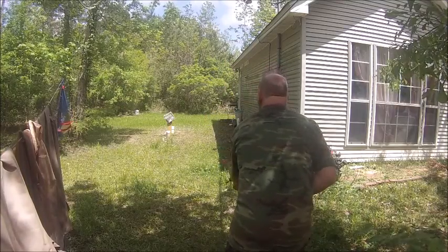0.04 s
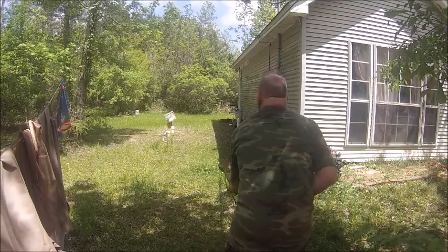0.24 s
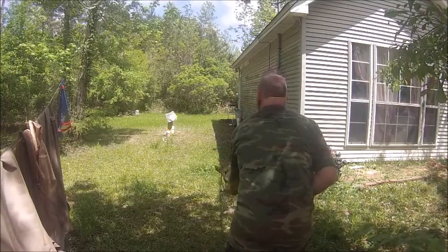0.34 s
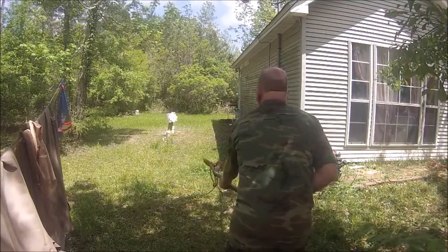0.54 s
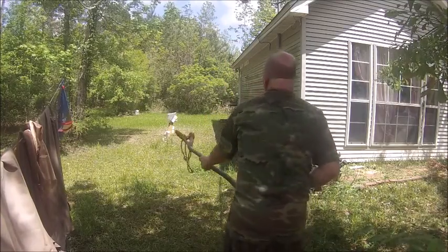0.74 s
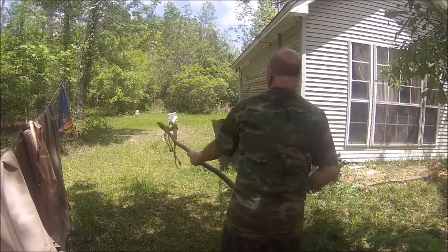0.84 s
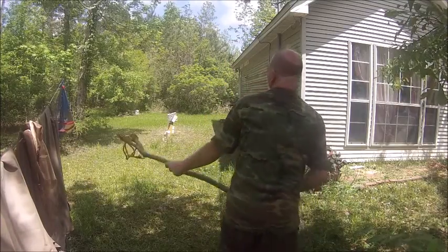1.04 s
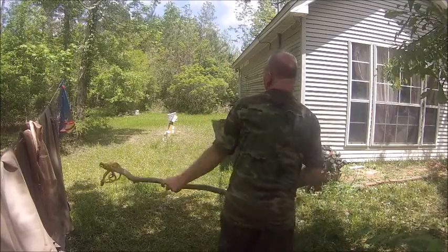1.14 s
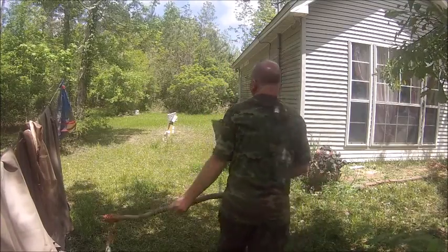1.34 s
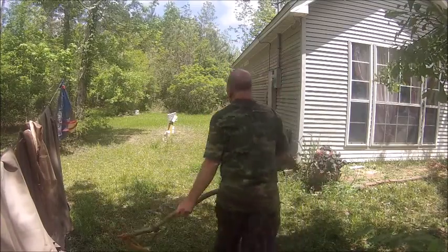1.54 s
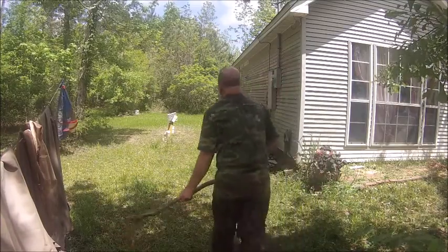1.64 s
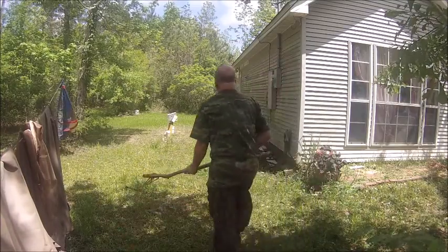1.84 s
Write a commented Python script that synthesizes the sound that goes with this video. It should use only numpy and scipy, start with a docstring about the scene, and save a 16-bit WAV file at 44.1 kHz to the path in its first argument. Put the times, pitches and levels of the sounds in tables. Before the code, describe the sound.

A rubber-band crossbow fires once with a sharp, close snap in a garden.

```python
"""A rubber-band crossbow fires once in a garden, close enough to overload the microphone: the band slaps home
and rings the stock. Lawn, wall, fence and house reflect the snap, house and bushes scatter it, and the woods
ring on. Far off the shot knocks on something; clothes rustle, birds whistle in the trees and insects whine in
the grass. Light wind and soft bumps reach the microphone over a low hum."""
import sys
import numpy as np
from scipy import signal
from scipy.fft import rfft, irfft
from scipy.io import wavfile
from scipy.ndimage import uniform_filter1d

SR = 44100
rng = np.random.default_rng(int(sys.argv[2]) if len(sys.argv) > 2 else 0)


def wav_record(signal):
    """Record a signal, one row per channel, as 16-bit PCM in the file named by sys.argv[1]."""
    frames = np.transpose(np.atleast_2d(signal))
    bounded = np.clip(frames, -1, 1)
    # unit amplitude maps onto the largest positive 16-bit level
    quanta = np.round(bounded * 32767).astype(np.int16)
    wavfile.write(sys.argv[1], SR, quanta)


N = 83790

# still garden air: frequency_hz, relative_db
AIR_SPECTRUM = [(120, -45), (200, -7), (240, -3.5), (298, -1.5), (405, -4.5), (624, -4.5), (721, -7.5),
                (789, -4), (1410, -6.5), (1690, -14), (2460, -10), (3010, -15), (15000, -32.5)]
# hiss that differs between left and right: frequency_hz, relative_db
SIDE_SPECTRUM = [(100, 1), (500, -12.5), (2000, -11), (4500, -2.5), (8000, -5.5), (11000, -24)]
# course of the low hum: time_s, level_db
HUM_LEVELS = [(0, -40), (.3, -46.5), (0.549, -55), (.74, -52), (.86, -42), (1.2, -41), (1.6, -40),
              (1.9, -41)]
# gusts on the microphone: time_s, level_db
GUST_LEVELS = [(0, -34), (.06, -38), (.12, -51.5), (0.201, -36), (.29, -44), (.36, -34.5), (.62, -37),
               (.71, -44), (.77, -38), (.87, -43.5), (1.011, -39), (1.08, -51), (1.481, -51.5),
               (1.62, -40.5), (1.751, -37), (1.79, -46.5), (1.85, -39), (1.9, -48.5)]
# rumble of the gusts: frequency_hz, relative_db
WIND_SPECTRUM = [(20, -4), (45, -2), (90, 2), (160, -6.5), (230, -16), (330, -28.5), (600, -43.5),
                 (2000, -70.5)]
# bumps on the microphone: start_s, level_db
MIC_BUMPS = [(.192, -27), (1.005, -33), (1.722, -25), (1.742, -23), (1.836, -20)]
# ring of one bump: pitch_hz, relative_db, t60_s
MIC_BUMP_MODES = [(85, 0, .05), (150, -6, .04)]
# opening wash of noise: frequency_hz, relative_db
WASH_SPECTRUM = [(180, -44), (300, -4), (943, -6.5), (1110, -4), (1620, -13.5), (3330, -15), (10800, -28),
                 (15000, -29.5)]
# insects in the grass: pitch_hz, width_hz, level_db, fade_start_s
INSECT_WHINES = [(10100, 310, -78, .23), (9200, 500, -83, 2.2)]
# bird whistles that dip and sweep up: start_s, level_db
BIRD_WHISTLES = [(1.515, -60), (1.80, -59)]
# course of one whistle: age_s, pitch_hz, relative_db
WHISTLE_SHAPE = [(0, 2750, -7), (.022, 2370, 0), (.04, 2350, 0), (.06, 2380, -10), (.08, 2720, -1),
                 (.103, 3500, 0), (.12, 3700, -14)]
# flatter bird notes: start_s, length_s, first_hz, last_hz, level_db
BIRD_NOTES = [(.06, 0.083, 2570, 2540, -65), (0.161, 0.065, 2630, 2650, -60), (0.743, 0.1, 2807, 2760, -65),
              (0.853, 0.04, 3425, 3070, -65), (.87, 0.22, 2755, 2910, -67), (1.125, .09, 2510, 2460, -69)]
# rustles of cloth and grass: peak_s, spread_s, level_db
RUSTLE_SWELLS = [(0.602, 0.025, -59), (0.75, .006, -59), (0.764, 0.035, -62), (1.44, 0.023, -64.5),
                 (1.556, 0.049, -66.5), (1.716, 0.037, -64), (1.825, 0.021, -66)]
# hiss of a rustle: frequency_hz, relative_db
RUSTLE_SPECTRUM = [(500, -8), (1500, 10), (4000, -2.5), (7000, 0.5), (10500, 4), (15000, -4)]
# knocks far down the garden: start_s, level_db
FAR_KNOCKS = [(0.4644, -40), (.619, -40.5), (0.6909, -39.5), (0.7183, -44.5)]
# ring of the thing struck: pitch_hz, relative_db, t60_s
TARGET_MODES = [(994, -6, .04), (1144, -1.5, 0.032), (1400, -12, .025)]
# late echo of the woods: frequency_hz, relative_db
WOODS_SPECTRUM = [(300, -32.5), (700, -9.5), (1000, 0.5), (1400, -5), (2000, -13.5), (3000, -20),
                  (3550, -17), (4600, -25), (9000, -24), (15000, -33.5)]
# early scatter from house, fence and bushes: frequency_hz, relative_db
SCATTER_SPECTRUM = [(150, -18.5), (400, -23), (520, -8.5), (600, -5), (710, -10.5), (850, 0.5),
                    (1150, -2.5), (1550, -6), (1830, -19), (2060, -12.5), (2350, -18.5), (2550, -17.5),
                    (3100, -29), (3520, -15), (3850, -23.5), (4200, -24.5), (4800, -31), (7200, -31.5),
                    (10500, -37.5), (15000, -44.5)]
# narrow rings in the scatter: pitch_hz, width_hz, level_db, t60_s
SCATTER_RINGS = [(3510, 230, -46, 0.92), (540, 90, -37, 0.5)]
# reflections from lawn, wall, fence and house: delay_s, gain_db, cutoff_hz
REFLECTIONS = [(.0033, -11.3, 2450), (.007, -23.7, 2800), (.0165, -30, 1990), (.0385, -31, 1800),
               (.0855, -27.5, 1100)]
# dry crack of the rubber: frequency_hz, relative_db
CRACK_SPECTRUM = [(6500, -36.5), (8000, -4), (12000, 3.5), (14500, -14)]
# ring of band and stock: pitch_hz, relative_db, t60_s
CROSSBOW_MODES = [(268, -15, .0045), (637, -14, .0092), (796, -11.3, .0087), (1257, -36, .036),
                  (1550, -24.6, .0125), (2260, -30, .0135), (2830, -15.2, .0032), (3680, -25, .012),
                  (4145, -7, .0041), (5090, -16, .0055), (7130, -12, .0075), (8720, -10, .0074)]

SNAP_S = .23643


def undb(db):
    """Decibels to gain."""
    return 10 ** (np.asarray(db) / 20)


def since(start):
    """Seconds since a moment, zero before it."""
    return np.maximum(np.arange(N) / SR - start, 0)


def fade(age, t60):
    """Exponential decay, 60 dB down after t60 seconds."""
    return np.exp(-np.log(1000) * age / t60)


def noise(spectrum):
    """Unit noise shaped by (frequency_hz, relative_db) points."""
    hz, db = np.array(spectrum, float).T
    f = np.maximum(np.fft.rfftfreq(N, 1 / SR), 1)
    gain = undb(np.interp(np.log(f), np.log(hz), db))
    x = irfft(rfft(rng.standard_normal(N)) * gain, N)
    return x / x.std()


def band(hz, width):
    """Unit noise in one resonance."""
    f = np.fft.rfftfreq(N, 1 / SR)
    x = irfft(rfft(rng.standard_normal(N)) / (1 + ((f - hz) / (width / 2)) ** 2), N)
    return x / x.std()


def drift(rate_hz):
    """Smooth random drift with a spread of 1."""
    hold = int(SR / rate_hz)
    steps = np.repeat(rng.standard_normal(N // hold + 1), hold)
    x = uniform_filter1d(uniform_filter1d(steps, hold), hold)[:N]
    return x / x.std()


def ring(modes, age):
    """Damped modes after a blow."""
    return sum(undb(db) * np.sin(2 * np.pi * hz * age) * fade(age, t60) for hz, db, t60 in modes)


def dull(x, hz):
    """Gentle low-pass."""
    return signal.sosfilt(signal.butter(2, hz, fs=SR, output="sos"), x)


def air(level_db=-57, sway_db=.78):
    """The garden air all around: a faint, swaying hush."""
    return noise(AIR_SPECTRUM) * undb(level_db + sway_db * drift(6.24))


def hum(pitch_hz=35, wobble=.039, sway_db=1.2):
    """A low tone wavers in pitch and level."""
    hz = pitch_hz * (1 + wobble * drift(6.7))
    level_db = np.interp(since(0), *np.array(HUM_LEVELS).T) + sway_db * drift(4.5)
    return np.sqrt(2) * np.sin(2 * np.pi * np.cumsum(hz) / SR) * undb(level_db)


def wind():
    """Light gusts buffet the microphone."""
    return noise(WIND_SPECTRUM) * undb(np.interp(since(0), *np.array(GUST_LEVELS).T))


def bumps(rise_s=.004):
    """Soft low bumps, right on the microphone."""
    return sum(undb(db) * ring(MIC_BUMP_MODES, since(start)) * (1 - np.exp(-since(start) / rise_s))
               for start, db in MIC_BUMPS)


def wash(level_db=-43.5):
    """A wash of noise dies away at the opening."""
    return undb(level_db) * fade(since(0), t60=.24) * noise(WASH_SPECTRUM)


def insects():
    """Thin, high whines from the grass."""
    return sum(undb(db) * fade(since(end), t60=.082) * band(hz, width)
               for hz, width, db, end in INSECT_WHINES)


def birds(waver=.032, flutter_db=2):
    """Near-pure whistles from the trees, smeared by the foliage."""
    def tone(hz):
        return np.sin(2 * np.pi * np.cumsum(hz * (1 + waver * drift(200))) / SR)
    t, song = since(0), 0
    ages, pitches, shape_db = np.array(WHISTLE_SHAPE).T
    for start, db in BIRD_WHISTLES:
        gate = uniform_filter1d(1. * (t > start) * (t < start + ages[-1]), size=200)
        envelope = gate * undb(db + np.interp(t - start, ages, shape_db))
        song += envelope * tone(np.interp(t - start, ages, pitches))
    for start, length, first_hz, last_hz, db in BIRD_NOTES:
        progress = np.clip((t - start) / length, 0, 1)
        envelope = undb(db) * np.sqrt(np.abs(np.sin(np.pi * progress)))
        song += envelope * tone(first_hz + (last_hz - first_hz) * progress)
    song *= undb(flutter_db * drift(120))
    foliage = rng.standard_normal(N) * fade(t, t60=.2)
    return song + signal.fftconvolve(song, foliage / np.linalg.norm(foliage))[:N]


def rustles(grain_db=3):
    """Cloth and grass stir in short grainy swells."""
    swells = sum(undb(db) * np.exp(-((since(0) - peak) / spread) ** 2 / 2)
                 for peak, spread, db in RUSTLE_SWELLS)
    return swells * noise(RUSTLE_SPECTRUM) * undb(grain_db * drift(400))


def knocks():
    """The shot strikes something far down the garden."""
    return sum(undb(db) * ring(TARGET_MODES, since(start)) for start, db in FAR_KNOCKS)


def echoes(scatter_db=-26, sag_db_per_s=44.5, hold_s=.11, woods_db=-41, woods_rise_s=.0488, patchy_db=.5):
    """Dense scatter sags slowly while the snap crosses the garden, then dies; the woods ring on."""
    age = since(SNAP_S)
    envelope = undb(scatter_db - sag_db_per_s * age) * fade(since(SNAP_S + hold_s), t60=.46)
    scatter = envelope * noise(SCATTER_SPECTRUM)
    rings = sum(undb(db) * fade(age, t60) * band(hz, width) for hz, width, db, t60 in SCATTER_RINGS)
    early = (1 - np.exp(-age / .003)) * (scatter + rings)
    woods = undb(woods_db) * fade(age, t60=1.98) * noise(WOODS_SPECTRUM)
    late = (1 - np.exp(-age / woods_rise_s)) * woods
    return (early + late) * undb(patchy_db * drift(150))


def stock_blow(start, gain_db=24, rise_s=.00086, contact_hz=1630):
    """Band and stock ring after the slap; the soft rubber rounds off the treble."""
    age = since(start)
    motion_modes = [(hz, db - 20 * np.log10(2 * np.pi * hz), t60) for hz, db, t60 in CROSSBOW_MODES]
    motion = ring(motion_modes, age) * (1 - np.exp(-age / rise_s))
    speed = np.gradient(motion) * SR  # the air follows the speed of the surface
    return undb(gain_db) * dull(speed, contact_hz)


def crossbow(crack_db=-39, crack_rise_s=.001):
    """Near the microphone the band cracks home; lawn, wall, fence and house send back duller copies."""
    progress = np.minimum(since(SNAP_S) / crack_rise_s, 2)  # the crack peaks at 1 and ends at 2
    crack = undb(crack_db) * np.sqrt(progress * (2 - progress)) * noise(CRACK_SPECTRUM)
    reflections = sum(undb(db) * dull(stock_blow(SNAP_S + delay), hz) for delay, db, hz in REFLECTIONS)
    return stock_blow(SNAP_S) + crack + reflections


def scene(side_db=-82.5):
    """Everything sits in the centre, with a trace of stereo width in the hiss."""
    shot = crossbow() + echoes() + knocks()
    mid = shot + rustles() + wash() + birds() + insects() + bumps() + wind() + hum() + air()
    side = undb(side_db) * noise(SIDE_SPECTRUM)
    return np.array([mid + side, mid - side])


def record(dry, ceiling=.95, knee=12, rolloff_hz=12500, top_hz=15000):
    """The snap overloads the microphone with a rounded knee; the top rolls off and is cut."""
    clipped = dry / (1 + np.abs(dry / ceiling) ** knee) ** (1 / knee)
    top_cut = signal.ellip(8, .1, 70, top_hz, fs=SR, output="sos")
    return signal.sosfilt(top_cut, dull(clipped, rolloff_hz))


dry = scene()
out = record(dry)
wav_record(out)
```